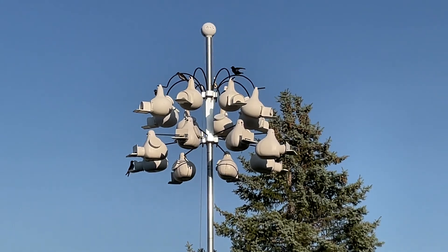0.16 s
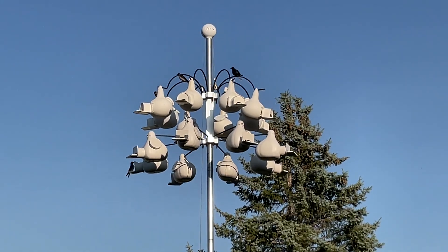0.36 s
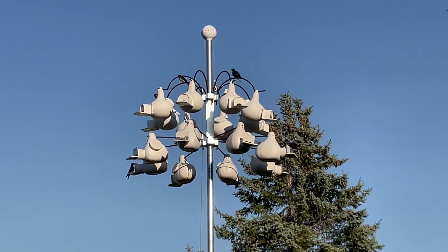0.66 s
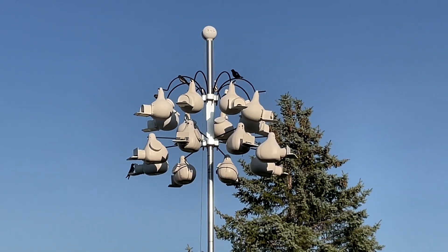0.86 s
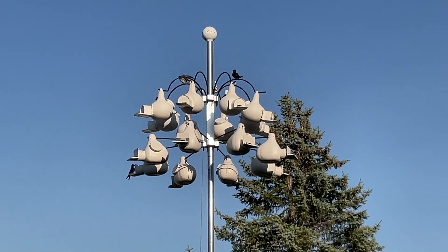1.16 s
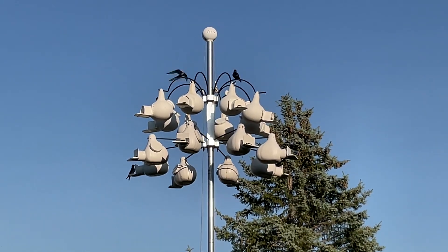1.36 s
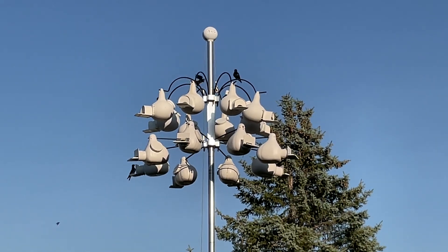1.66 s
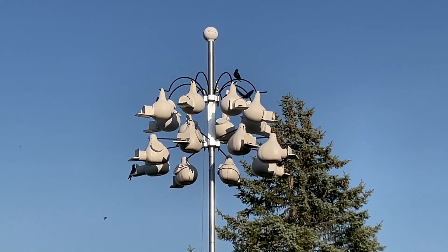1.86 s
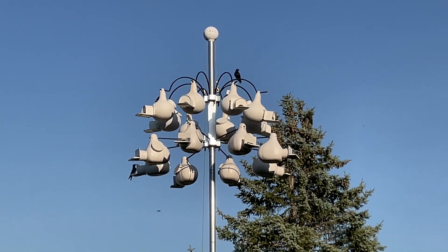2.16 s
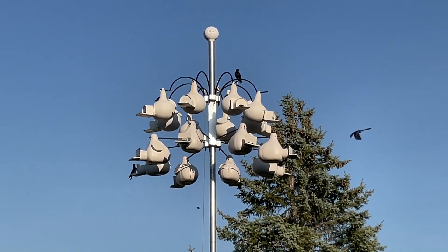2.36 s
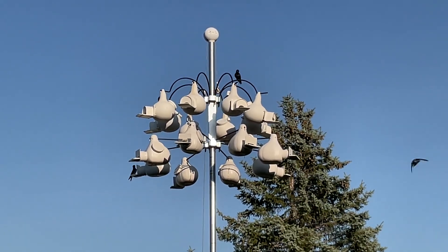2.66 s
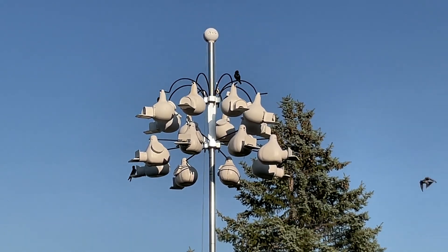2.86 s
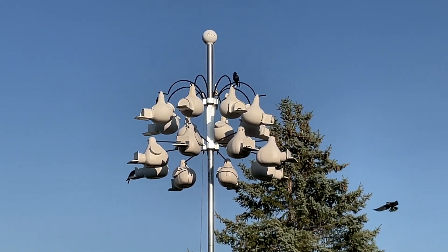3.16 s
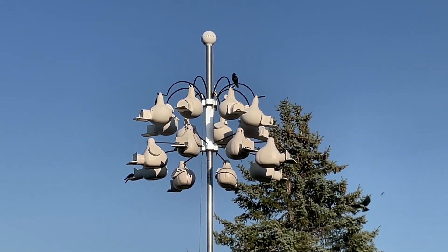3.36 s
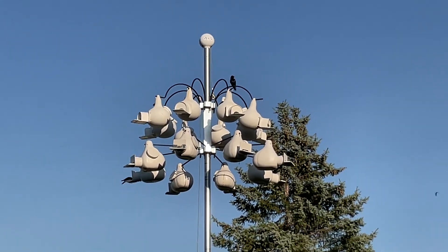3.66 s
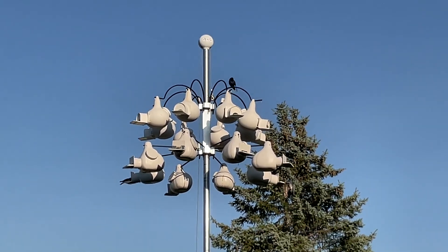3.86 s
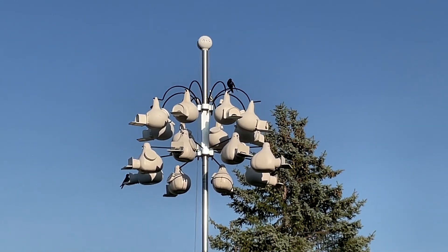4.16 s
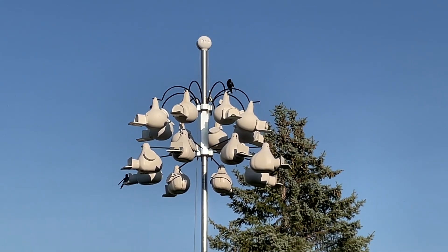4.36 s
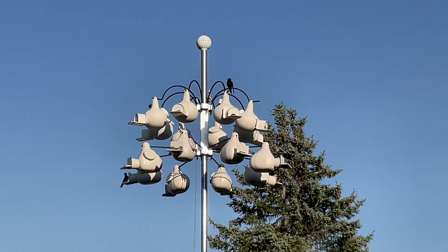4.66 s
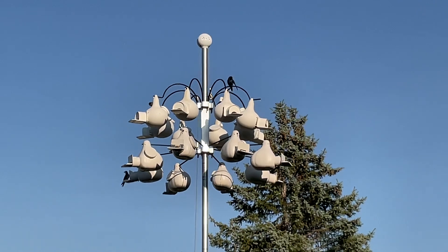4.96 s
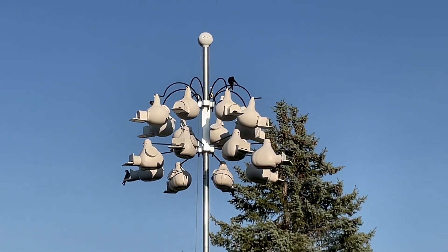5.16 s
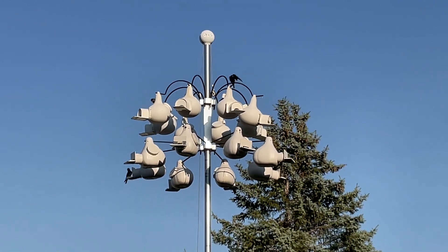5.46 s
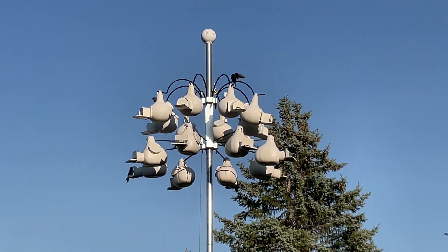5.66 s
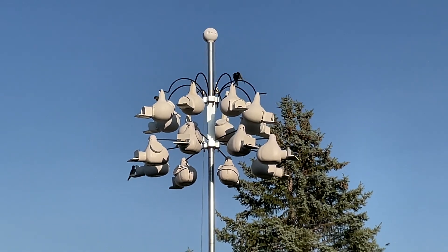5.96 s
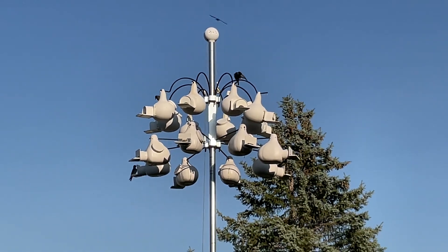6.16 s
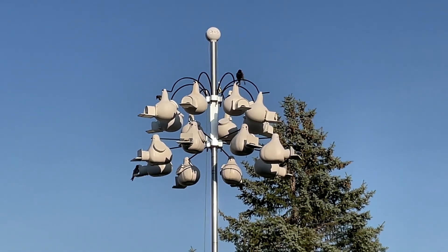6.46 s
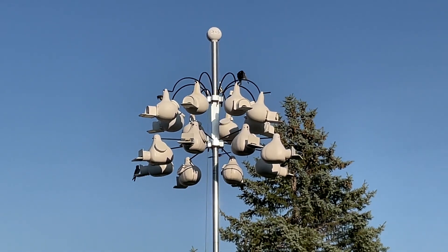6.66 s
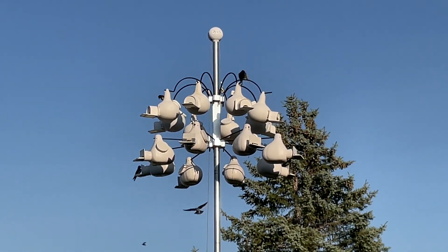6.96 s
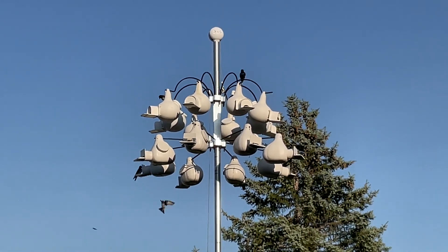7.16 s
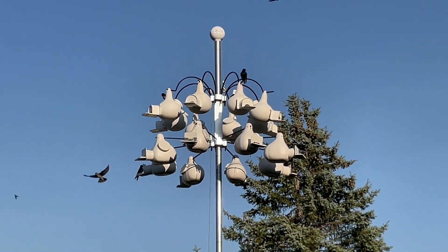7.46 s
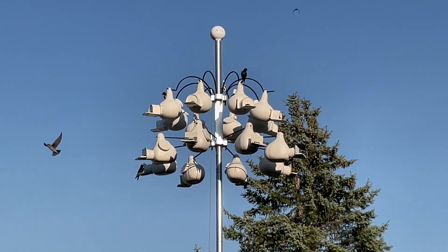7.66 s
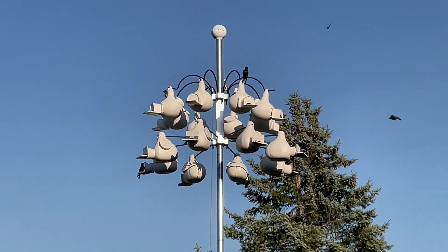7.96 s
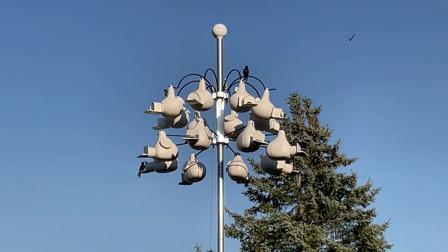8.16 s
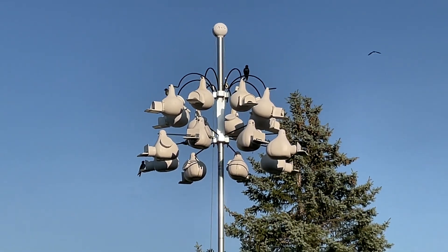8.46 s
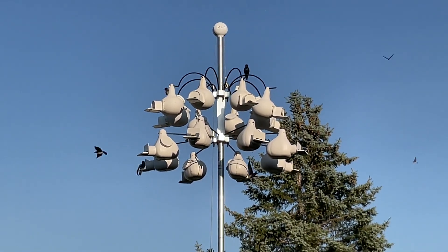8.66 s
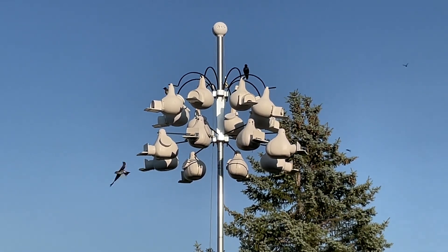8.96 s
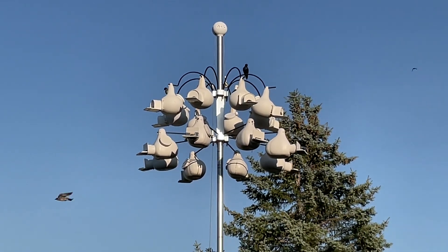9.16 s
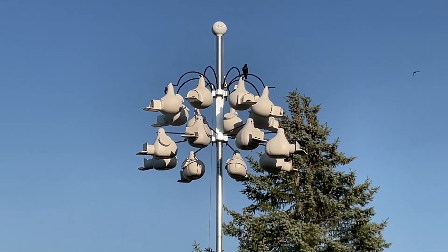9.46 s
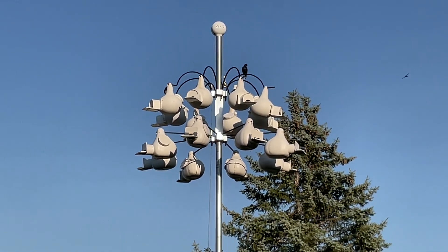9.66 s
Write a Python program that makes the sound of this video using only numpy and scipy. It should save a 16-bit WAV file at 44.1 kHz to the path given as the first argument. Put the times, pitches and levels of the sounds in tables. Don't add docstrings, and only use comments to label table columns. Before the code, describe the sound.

A steady, low, slightly wavering hum of distant machines blends with a soft rush of traffic and leaves in an open suburban yard. Purple martins call nearby, with faint chatter further off and light echoes from trees and houses. At 0.15 s a burry trill and falling chirp sound together; a quick double chirp comes at 0.8 s and a low trill with a dull gourd knock near 1.1 s. From 2.0 to 2.9 s bright down-sliding chirps follow rapidly, each answered by a softer level note, with small hollow knocks. A buzzy trill comes at 3.1 s, then sparse weak notes, a chirp at 4.6 s and trills around 5.0 and 6.4 s. From 7 to 8.7 s calls grow busy again, with clear chirps, double calls and rattling trills. A tiny bill snap clicks near 8.8 s; a burry trill at 9.1 s and a faint falling one at 9.65 s close it.

```python
import sys
import numpy as np
from scipy import signal
from scipy.fft import rfft, irfft, next_fast_len
from scipy.io import wavfile
from scipy.ndimage import uniform_filter1d, map_coordinates

SR = 44100
rng = np.random.default_rng(int(sys.argv[2]) if len(sys.argv) > 2 else 0)


def nominal_scale(level):
    x = np.asarray(level, float) / 20
    return 10 ** x


def unload_wav(signal):
    wavfile.write(
        sys.argv[1],
        SR,
        np.round(np.clip(np.atleast_2d(signal).T, -1, 1) * 32767).astype(np.int16),
    )


N = 432176

OVERTONES_DB = [0, -28.5, -36, -44]


def along(points, hz):
    f, v = np.transpose(points)
    return np.interp(np.log(hz + 1), np.log(f + 1), v)


def curves(rows):
    s, *cols = np.transpose(rows)
    return [np.interp(np.arange(N) / SR, s, c) for c in cols]


def wobble(rate, count=None):
    count = count or N
    knots = rng.standard_normal(int(count * rate / SR) + 4)
    return map_coordinates(knots, [np.arange(count) * rate / SR])


def filtered(x, response):
    m = next_fast_len(N + 8192)
    return irfft(rfft(x, m) * response(np.fft.rfftfreq(m, 1 / SR)), m)[..., :N]


def add(track, s, sound):
    part = track[max(round(s * SR), 0):][:len(sound)]
    part += sound[:len(part)]


def progress(length):
    return np.linspace(0, 1, round(length * SR))


def hum():
    # (time [s], compressor [dB], fan [dB], pump [dB], compressor octave [dB])
    machine_levels = [(0.0, -48.5, -54, -48.5, -54.5), (0.95, -49, -50.5, -47.5, -55.5),
                      (4.26, -45, -50, -64.5, -55), (5.27, -59.5, -50.5, -51.5, -60),
                      (6.39, -44.5, -49, -50, -49.5), (6.82, -49, -47, -44.5, -60),
                      (8.84, -50, -50, -50, -48.5), (9.8, -50, -45, -56, -56.5)]
    # (time [s], pitch [Hz])
    fan_speed = [(0, 77.11), (8.8, 79.19), (9.8, 85.9)]
    # (pitch [Hz], rms level [dB])
    steady_lines = [(54, -59.5), (153, -64), (186, -69.5), (203, -87), (247, -76), (303, -79.5)]
    compressor_hz, pump_hz = 61.45, 102.9
    compressor_db, fan_db, pump_db, octave_db = curves(machine_levels)
    fan_hz = curves(fan_speed)[0]
    lines = [(compressor_hz, compressor_db - 3.5), (fan_hz, fan_db - 0.5),
             (pump_hz, pump_db), (2 * compressor_hz, octave_db + 0.5)]
    total = np.zeros(N)
    for hz, db in lines + steady_lines:
        level = nominal_scale(db + 2 + 2.68 * wobble(4.3))
        drifting_hz = hz * (1 + 0.00813 * wobble(3))
        total += level * np.sin(2 * np.pi * np.cumsum(drifting_hz) / SR)
    return total


def rush(patchy_db=1.32):
    # (frequency [Hz], level per Hz [dB])
    rush_levels = [(25, -94.5), (45, -77.5), (90, -70), (170, -82), (300, -94), (600, -95.5), (1100, -101),
                   (1800, -106), (3200, -108), (4700, -120), (5400, -115), (6100, -127), (9000, -130),
                   (13000, -134)]
    # (frequency [Hz], likeness [0-1])
    alike = [(90, 0.99), (170, 0.84), (260, 0.6), (500, .75), (1000, 0.1), (1500, 0.65), (2200, 1),
             (4000, 1), (9000, 0.79)]
    z = signal.stft(rng.standard_normal((2, N)), nperseg=512)[2]
    patches = uniform_filter1d(rng.standard_normal(z.shape[1:]), 6, 0)
    patches = uniform_filter1d(patches, 14, 1)
    pair = signal.istft(z * nominal_scale(patchy_db * patches / patches.std()), nperseg=512)[1][:, :N]

    def mid_and_side(hz):
        turn = np.arccos(np.clip(along(alike, hz), -1, 1)) / 2
        return nominal_scale(along(rush_levels, hz)) * np.sqrt(SR / 2) * [np.cos(turn), np.sin(turn)]

    mid, side = filtered(pair, mid_and_side)
    return np.array([mid + side, mid - side])


def voice(hz, partials_db, effort_db=0, hollow_db=-9):
    # (centre [Hz], width [Hz], lift [dB])
    throat = [(3700, 950, 19.5), (5200, 800, 5), (7400, 1300, 3), (11700, 1000, 8)]
    turn = 2 * np.pi * np.cumsum(hz) / SR + rng.uniform(0, 2 * np.pi)
    sound = np.sin(turn)
    for number, db in enumerate(partials_db[1:], start=2):
        over = number * hz
        lift_db = sum(peak_db * np.exp(-((over - c) / w) ** 2) for c, w, peak_db in throat)
        lift_db += hollow_db * np.exp(-((over - 9700) / 800) ** 2)
        lift_db += effort_db * np.clip((over - 5500) / 9000, 0, 1)
        lift_db += rng.normal(0, 1) + 1.8 * wobble(200, count=len(hz))
        sound = sound + nominal_scale(db + lift_db) * np.sin(number * turn) * (over < 13300)
    return sound


def whistle(length, start, middle, end, db, rise=1.2, fall=.8):
    u = progress(length)
    hz = start + (end - start) * u + 2 * (2 * middle - start - end) * u * (1 - u)
    swell = u ** rise * (1 - u) ** fall
    tone = voice(hz, OVERTONES_DB, .9 * (db + 29))
    return tone * swell / swell.max() * nominal_scale(db + 2.0 * wobble(150, count=len(u)))


def colony(count=800):
    track = np.zeros(N)
    for when, pitch, size, span in rng.uniform(size=(count, 4)):
        start = 2900 + 1900 * pitch
        note = whistle(.02 + 0.024 * span, start, .8 * start, 0.686 * start, 5 * size - 60)
        add(track, when * N / SR, note)
    return filtered(track, lambda hz: nominal_scale(-4 * (hz / 5200) ** 4))


def slurs():
    # (time [s], length [s], start
    # pitch [Hz], end pitch [Hz], peak level [dB])
    sliding_notes = [(0.125, 0.02, 3830, 3550, -59), (0.989, 0.036, 2310, 1550, -55.5),
                     (2.754, 0.029, 3200, 2140, -51), (0.201, 0.039, 2490, 2240, -39.5),
                     (4.107, .03, 3000, 1696, -55), (6.073, 0.017, 3500, 2110, -53),
                     (7.161, .018, 2670, 1900, -53.5), (7.211, 0.019, 1950, 1690, -57.5),
                     (7.918, 0.025, 4320, 3070, -54.5), (8.377, .015, 2500, 1850, -50.5),
                     (8.416, 0.023, 2290, 1800, -57), (8.443, .02, 2540, 2210, -48.5),
                     (8.802, 0.058, 3700, 2400, -53.5), (9.105, 0.046, 2050, 1900, -58),
                     (6.527, 0.018, 4020, 3320, -56), (5.324, .014, 3750, 3330, -62),
                     (6.725, 0.029, 5490, 5330, -72), (8.034, 0.014, 6200, 5400, -67),
                     (8.872, .025, 2980, 2750, -52),
                     (4.137, .028, 3000, 2150, -59), (4.163, .034, 2750, 2500, -60),
               (4.145, .05, 1820, 1740, -65.5), (3.8, .018, 3800, 3300, -64.5),
               (4.022, .016, 8100, 6500, -74), (4.03, .024, 6600, 5400, -72), (.932, .018, 7900, 5400, -71),
               (.948, .028, 7900, 6400, -67), (4.893, .012, 8100, 6500, -70), (4.55, .035, 4100, 2500, -61),
               (3.795, .016, 6700, 5300, -69), (1.692, 0.018, 3800, 2100, -56),
               (1.83, .035, 3500, 2500, -66), (1.955, .03, 3800, 2300, -60), (5.49, .03, 3800, 2800, -69)]
    scraps = [(.018, .016, 3900, 3200, -63), (.065, .035, 5100, 5200, -67), (.11, .016, 6800, 6600, -68),
              (.4, .015, 4000, 3500, -64), (.61, .018, 4150, 3500, -63), (.655, .016, 3900, 3300, -66),
              (.672, .03, 4500, 3300, -65), (4.4, .022, 3700, 2700, -66), (4.005, .022, 4250, 4050, -67),
              (4.228, .018, 3800, 3400, -66), (5.58, .022, 4300, 5100, -72), (5.6, .014, 3950, 3400, -69),
              (6.79, .022, 3900, 4700, -69), (6.848, .02, 5900, 5300, -69), (6.966, .018, 7700, 5500, -70),
              (6.99, .04, 5200, 3400, -64), (7.268, .025, 7100, 6400, -68), (7.433, .014, 7300, 6200, -66),
              (7.415, .022, 7400, 5200, -68), (7.522, .028, 7600, 6500, -69),
              (7.518, .014, 6100, 5200, -68), (7.53, .02, 4900, 4300, -64), (7.893, .02, 7900, 7000, -69),
              (8.424, .016, 4400, 3900, -57), (.044, .008, 1750, 1450, -56), (2.7, .008, 1600, 1350, -58),
              (7.321, .008, 6200, 5800, -62), (.93, .012, 2150, 2000, -58), (.856, .022, 8400, 7400, -67),
              (8.56, .025, 8300, 7200, -69), (.824, .022, 8800, 7600, -63), (8.52, .025, 9200, 7600, -65),
              (7.78, .028, 9200, 7400, -68), (9.415, .026, 3950, 3300, -59)]
    # (time [s], length [s], start pitch [Hz], peak level [dB])
    far_notes = [(0.004, 0.0098, 3900, -61), (1.222, .02, 3280, -63), (1.31, 0.017, 3940, -60),
                 (1.815, 0.03, 3900, -75), (2.572, .04, 4060, -64), (2.884, .03, 2170, -63),
                 (3.225, .021, 3280, -64), (3.378, 0.03, 4120, -60.5), (3.801, 0.039, 3860, -63),
                 (3.808, 0.024, 2400, -59.5), (4.37, .025, 4140, -64.5), (4.47, .02, 3680, -63),
                 (4.669, 0.023, 2540, -57), (4.757, 0.018, 3900, -66), (5.244, .013, 3100, -61),
                 (5.532, .016, 6200, -68), (5.758, 0.023, 4080, -63), (5.836, 0.02, 3940, -60.5),
                 (6.128, 0.021, 3140, -60), (6.631, .017, 4640, -63), (6.815, 0.043, 4320, -62.5),
                 (5.725, .02, 4700, -64.5), (8.226, 0.037, 4300, -68.5), (9.013, 0.02, 3720, -61.5), ]
    # (time [s], length [s], top pitch [Hz], peak level [dB])
    arches = [
        (9.315, .04, 5000, -64),
        (9.375, .04, 4000, -61),
        (5.64, .04, 3700, -68),
    ]
    far_fall_per_s, scrap_db = 10.5, -4
    track = np.zeros(N)
    notes = sliding_notes
    for s, length, start, db in far_notes:
        notes.append((s, length, start, start * np.exp(-far_fall_per_s * length), db))
    for *note, db in scraps:
        notes.append((*note, db + scrap_db))
    for s, length, start, end, db in notes:
        add(track, s - .002, whistle(length + .004, start, (start + end) / 2, end, db))
    for s, length, top, db in arches:
        add(track, s, whistle(length, .82 * top, top, .82 * top, db + scrap_db, rise=.7))
    return track


def wheezes():
    # (time [s], length [s], centre [Hz], level [dB])
    hisses = [(.14, .1, 6900, -58), (9.11, .06, 7000, -64), (4.99, .09, 7800, -70), (6.44, .08, 7500, -72),
              (7.36, .08, 11600, -77), (.56, 0.078, 5900, -76), (1.168, 0.081, 5470, -72),
              (1.428, 0.05, 6000, -75), (1.498, 0.075, 6070, -70.5), (1.914, .05, 5800, -69),
              (2.473, 0.077, 5800, -68.5), (2.9, 0.076, 6060, -75), (3.285, 0.039, 6100, -71.5),
              (3.424, 0.04, 6100, -76), (3.508, 0.072, 5660, -72.5), (3.787, 0.072, 6400, -72.5),
              (4.037, 0.14, 6450, -72.5), (4.46, 0.051, 6000, -77), (5.237, .05, 5870, -76),
              (5.492, 0.059, 6000, -78), (5.698, 0.052, 6500, -74), (5.83, 0.041, 7350, -84),
              (6.143, 0.05, 5430, -74.5), (6.288, 0.043, 6630, -73), (7.883, 0.095, 7000, -74),
              (8.17, .1, 6500, -72), (8.803, 0.07, 6470, -67), (9.18, 0.17, 5900, -75),
              (9.417, 0.059, 6370, -74), (9.604, 0.099, 5580, -68)]
    track = np.zeros(N)
    for s, length, hz, db in hisses:
        u = progress(length)
        glide = hz * (1.05 - .1 * u)
        shake = 1 + 0.15 * np.tanh(wobble(900, count=len(u)))
        add(track, s, nominal_scale(db) * np.sin(np.pi * u) * voice(glide * shake, [0]))
    return track


def chew(brink, top, db, shelf_db, shelf_hz=2034, drop=.021, drop_db=-10, ring_db=0):
    crest_s, attack_s, settle_s, release_s = .0057, .0095, .017, .0031
    t = np.arange(round((brink + drop + crest_s) * SR)) / SR - crest_s
    linger = .001 + .0007 * max(db + 37, 0) * (ring_db == 0)

    def settle(s):
        return shelf_hz + (top - shelf_hz) * np.exp(-np.clip(s - linger, 0, None) / settle_s)

    last_drop = np.interp(t, [brink, brink + drop], [.89 * settle(brink), 1700])
    hz = np.where(t < brink, settle(t), last_drop)
    knee = min(settle_s + linger, .7 * brink)
    level_db = np.interp(t, [min(attack_s, knee), knee, brink, brink + .004],
                         [0, -1, shelf_db, shelf_db + drop_db])
    level_db += -10 * np.exp(-((t - brink) / .0015) ** 2)
    fade_in = (t + crest_s) / (attack_s + crest_s)
    edges = np.clip(np.minimum(fade_in, (t[-1] - t) / release_s), 0, 1)
    plunge_db = ring_db + 0.7 * (db + 30.5)
    long_shelf_db = .5 * ring_db + 399.5 * (min(brink, .049) + drop - .071) - shelf_db
    reedy_db = np.interp(t, [0.56 * knee, brink, brink + .002], [plunge_db, long_shelf_db, -shelf_db])
    smooth_hz = uniform_filter1d(hz, size=120, mode="nearest")
    tone = voice(smooth_hz, np.add.outer(OVERTONES_DB, reedy_db), 1.8 * (db + 32))
    return tone * edges * nominal_scale(db + level_db + 2.1 * wobble(150, count=len(t)))


def wit(length, start, end, db):
    flick_s, flick_hz, flick_db = .012, 1736, -16.5
    t = np.arange(round((length + flick_s) * SR)) / SR
    hz = np.interp(t, [0, .35 * length, length, length + 0.0037, t[-1]],
                   [start, end + .45 * (start - end), end, 1.08 * flick_hz, flick_hz])
    level_db = np.interp(t, [0, 0.23 * length, 0.8 * length, length + 0.0032, t[-1] - .003, t[-1]],
                         [-18, 0, -1.5, flick_db, flick_db, -40])
    tone = voice(hz, np.add(OVERTONES_DB, -7), .9 * (db + 27))
    return tone * nominal_scale(db + level_db + 1.8 * wobble(120, count=len(t)))


def chew_calls():
    # (time [s], time to the break [s], top pitch [Hz], peak level [dB], shelf under peak [dB])
    glides = [(.148, .02, 4300, -36.5, -2), (.931, .046, 4000, -51, 3), (2.033, 0.048, 4296, -31.5, -9.5),
              (2.219, 0.033, 4200, -36.5, -13.5), (2.402, .031, 4000, -35.5, -15),
              (2.643, 0.02, 4250, -36.5, -8.5), (2.77, .027, 4400, -34, -5.5),
              (4.579, .021, 4260, -40.5, -8), (4.896, 0.058, 4000, -47, -7), (6.963, .047, 4100, -49, -1.5),
              (7.202, 0.063, 4100, -46, -9), (7.33, 0.049, 4400, -33, -10.5),
              (7.41, 0.024, 4260, -44, -6.5), (7.509, 0.049, 3900, -53.5, -6),
              (8.062, 0.053, 4340, -36, -5.5)]
    # (time [s], stroke [dB], glide top [Hz], glide [dB], shelf under peak [dB])
    doubles = [
        (.786, -34.5, 3850, -35, 0),
        (7.745, -35, 3700, -37, 1),
        (8.488, -34, 3800, -36, 1),
    ]
    # (time [s], length [s], start pitch [Hz], end pitch [Hz], peak level [dB])
    answers = [(.855, 0.031, 2806, 2305, -39.5), (2.1, 0.03, 2500, 2090, -45),
               (2.27, 0.031, 2600, 2150, -50.5), (2.449, 0.034, 2650, 2080, -51),
               (2.68, .042, 2910, 2180, -47), (2.811, 0.038, 2950, 2200, -38), (4.63, .04, 2616, 2250, -42),
               (7.03, .015, 2460, 2100, -53), (7.295, .046, 2250, 1955, -54.5),
               (7.403, .03, 2400, 2130, -43), (7.454, .043, 2707, 2230, -43.5),
               (7.823, 0.031, 2780, 2280, -42), (8.132, .03, 2470, 2130, -46),
               (8.559, .037, 2795, 2310, -42), (2.856, .014, 2500, 2300, -49),
               (7.18, 0.032, 3050, 2100, -46.5)]
    track = np.zeros(N)
    for s, *call in glides:
        add(track, s - .0057, chew(*call))
    for s, stroke_db, top, db, shelf_db in doubles:
        add(track, s - .002, whistle(.026, 3500, 2900, 1930, stroke_db, rise=.6))
        glide = chew(.034, top, db, shelf_db, shelf_hz=2330, drop=.014, drop_db=-7.5, ring_db=4)
        add(track, s + .023 - .0057, glide)
    for s, *note in answers:
        add(track, s - .003, wit(*note))
    return track


def trills(swing_hz=220, depth=.55):
    # (time [s], length [s], top pitch [Hz], end pitch [Hz], level [dB])
    slow = [
        (1.078, .092, 2550, 2183, -48.5),
        (1.072, 0.085, 3640, 3070, -59.5),
        (6.89, .1, 2550, 2210, -59),
        (9.12, 0.087, 2430, 2127, -44),
        (9.649, 0.14, 3146, 2240, -51.5),
    ]
    middling = [(0.148, 0.09, 4144, 3790, -44), (0.166, 0.088, 3054, 2400, -35),
                (1.97, 0.12, 2630, 2500, -58), (3.118, .092, 2800, 2400, -46),
                (4.986, 0.1, 2800, 2416, -50), (6.44, .097, 2700, 2500, -49.5),
                (7.608, .145, 3310, 2350, -40), (8.358, .128, 3260, 2700, -39),
                (9.107, 0.034, 3900, 3500, -42.5), (9.125, 0.063, 3450, 3200, -46)]
    quick = [
        (3.086, 0.11, 4240, 3750, -47.5),
        (6.412, 0.11, 4104, 3810, -56.5),
        (1.952, .09, 4140, 3770, -54),
        (4.958, .118, 4150, 3900, -52.5),
    ]
    fast = [
        (8.588, 0.14, 3400, 3000, -43.5),
    ]
    track = np.zeros(N)
    flocks = [(slow, 123), (middling, 134), (quick, 144), (fast, 166)]
    for s, length, top, end, db, rate in [(*row, rate) for rows, rate in flocks for row in rows]:
        u = progress(length)
        flutter = 2 * np.pi * np.cumsum(rate * (1 + .05 * wobble(50, count=len(u)))) / SR
        arch = np.interp(u, [0, .27, 1], [.93 * top, top, end])
        arch += 500 * u * (1 - u) * (top - end) / 1000
        swing = swing_hz * np.clip(end / 2900 + 1.03 - u, .2, 1) * np.sin(flutter)
        hz = arch - swing + 50 * wobble(400, count=len(u))
        octave_db = -24 - 8 * (top < 3000) + 5 * (rate > 134)
        third_db = -23 - 11 * (top > 3700) - abs(db + 40)
        fading = np.outer([0, 1, 1], -12 * (u - .4 * (top > 4000)) ** 2)
        partials_db = fading + np.array([-1, octave_db, third_db])[:, None]
        tone = voice(hz, partials_db, .5 * (db + 26), hollow_db=0)
        swell = np.sin(np.pi * u) ** .6 * nominal_scale(1.5 * wobble(200, count=len(u)))
        pulses = 1 + depth * np.clip(end / 2900 + .6 - u, .3, 1.2) * np.cos(flutter)
        add(track, s, nominal_scale(db) * swell * pulses * tone)
    return track


def breath(calls):
    # (frequency [Hz], level [dB])
    air_colour = [(3500, -56), (4800, 10.5), (7000, 7.5), (8600, -1), (10000, -51), (13000, -18)]
    effort = np.abs(uniform_filter1d(np.abs(calls), size=1300, origin=500)) ** 0.71
    air = filtered(rng.standard_normal(N), lambda hz: nominal_scale(along(air_colour, hz)))
    return nominal_scale(-42) * effort * air / air.std()


def yard(x, early_db=8):
    # (frequency [Hz], time to fall 60 dB [s])
    echo_times = [(1500, 1), (3000, 0.49), (5000, 0.68), (9500, 0.05), (11500, .2)]
    out, step = np.zeros((2, N + SR)), SR // 4
    for i in range(0, N, step):
        hz, t, z = signal.stft(rng.standard_normal((2, SR // 2)), SR, nperseg=256)
        fade = nominal_scale(-60 * t / along(echo_times, hz)[:, None])
        fade = fade + nominal_scale(early_db - 60 * t / 0.019)
        shared, own = signal.istft(z * fade, SR, nperseg=256)[1]
        tail = np.array([shared + 0.088 * own, shared - 0.25 * own]) / np.linalg.norm(shared)
        echo = signal.fftconvolve(x[None, i:i + step], tail, axes=1)
        out[:, i + 100:i + 100 + echo.shape[1]] += echo
    return out[:, :N]


def taps():
    # (time [s], peak level [dB])
    bills = [
        (.541, -68),
        (0.5537, -70),
        (8.768, -55),
        (8.8727, -63.5),
    ]
    # (time [s], peak level [dB], gourd pitch [Hz])
    knocks = [
        (1.125, -45.5, 261),
        (2.143, -46.5, 746),
        (2.968, -43.5, 667),
    ]
    track, t = np.zeros(N), np.arange(2000) / SR
    for s, db in bills:
        crack = rng.standard_normal(len(t))
        bright = crack - uniform_filter1d(crack, size=11)
        add(track, s, nominal_scale(db - 60 * t / 0.011) * bright)
    for s, db, hz in knocks:
        ring = np.sin(2 * np.pi * hz * t) * (1 - np.exp(-t / 0.002))
        add(track, s, nominal_scale(db + 2.5 - 60 * t / 0.037) * ring)
    return track


def reedy_slurs():
    # (time [s], length [s], start pitch [Hz], end pitch [Hz], peak level [dB])
    reedy = [
        (4.08, .04, 3350, 1700, -50),
        (1.671, 0.032, 2850, 1830, -51.5),
        (1.703, 0.033, 2250, 1650, -56),
        (1.74, 0.0375, 1960, 1650, -62.5),
    ]
    reed_partials = [0, -21, -37]
    track = np.zeros(N)
    for s, length, start, end, db in reedy:
        u = progress(length)
        tone = voice(end + (start - end) * (1 - u) ** 1.1, reed_partials)
        add(track, s, nominal_scale(db) * np.sin(np.pi * u) ** .6 * tone)
    return track


def scene():
    # (time [s], level [dB])
    chatter = [(0.0, -67), (.5, -71.5), (1.96, -75), (2.13, -73.5), (3.25, -69.5), (3.79, -82.5),
               (4.88, -72.5), (6.08, -80), (7.64, -67.5), (8.19, -72.5), (8.62, -68), (8.87, -75.5),
               (9.8, -74.5)]
    calls = slurs() + chew_calls() + reedy_slurs() + trills()
    near = calls + breath(calls) + wheezes()
    near = near + nominal_scale(-13.5) * yard(near)
    far = colony()
    far = nominal_scale(-20) * far + yard(far)
    far = nominal_scale(curves(chatter)[0] + 6) * far / far.std()
    return near + far + taps() + hum() + rush()


def low_pass(x):
    return signal.sosfilt(signal.butter(12, 13060, fs=SR, output="sos"), x)


def record(dry):
    # (frequency [Hz], left minus right [dB])
    left_db = [(90, -0.17), (260, -3), (500, 2), (860, 8), (1300, 5.5), (1900, 2), (2900, 0), (12000, -3)]
    # (frequency [Hz], phase lag of the left [radians])
    left_lag = [(250, 0), (700, -2.3), (1300, -.5), (1900, 1.2), (2250, 2.1), (3000, 3.4), (3800, 5.4),
                (4500, 6), (5500, 5.6), (6400, 5.9), (7200, 5.1), (8300, 6), (10000, 6.7), (13000, 6.5)]
    left = filtered(dry[0], lambda hz: nominal_scale(along(left_db, hz)) * np.exp(-1j * along(left_lag, hz)))
    return low_pass(np.array([left, dry[1]]))


dry = scene()
out = record(dry)
unload_wav(out)
```